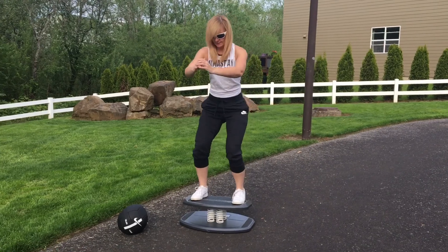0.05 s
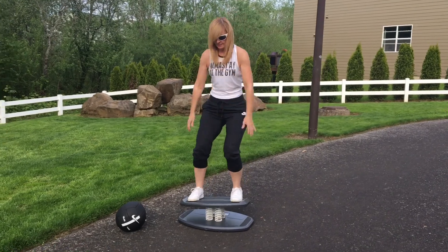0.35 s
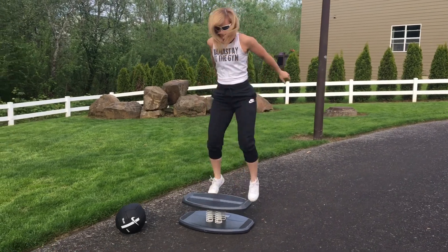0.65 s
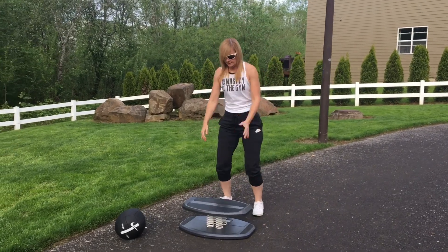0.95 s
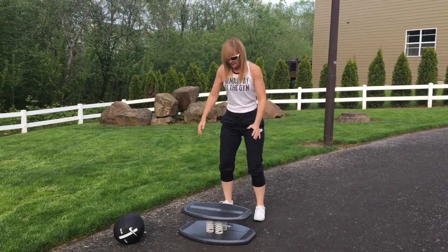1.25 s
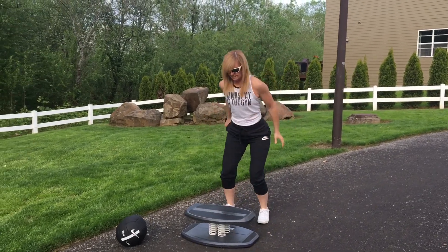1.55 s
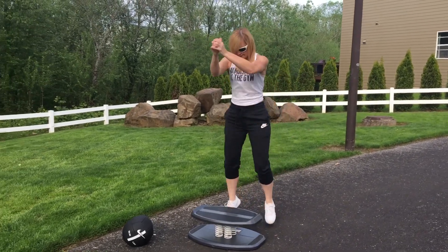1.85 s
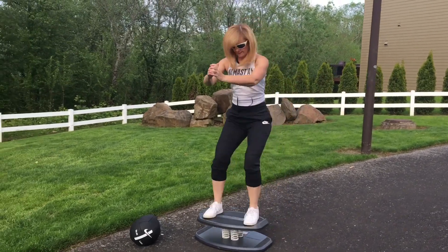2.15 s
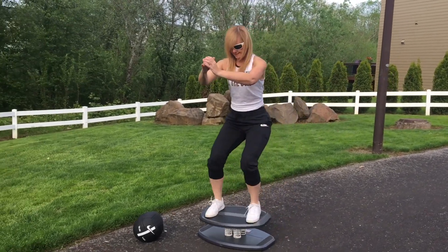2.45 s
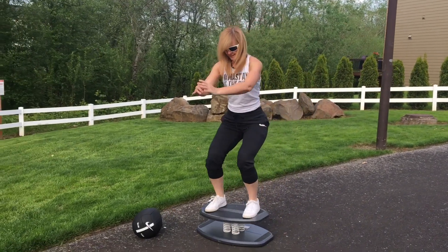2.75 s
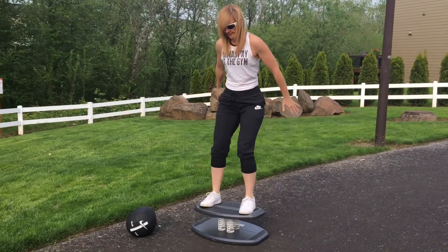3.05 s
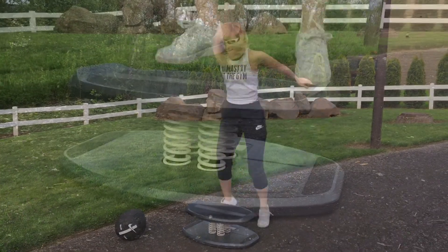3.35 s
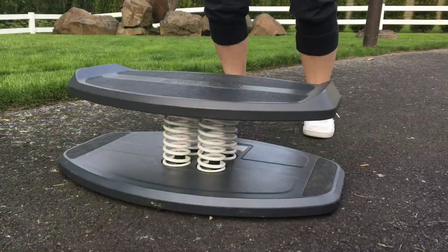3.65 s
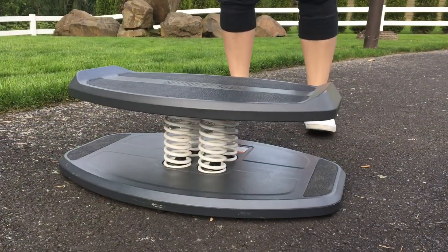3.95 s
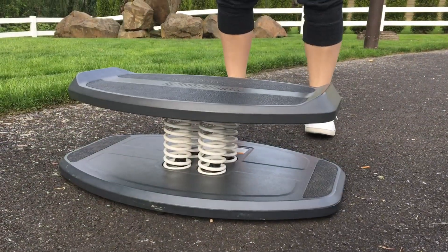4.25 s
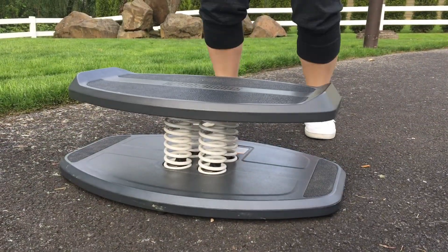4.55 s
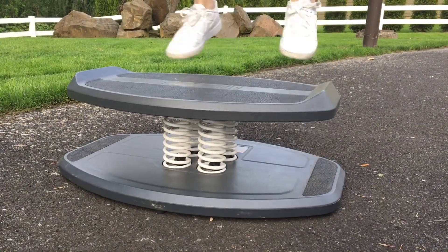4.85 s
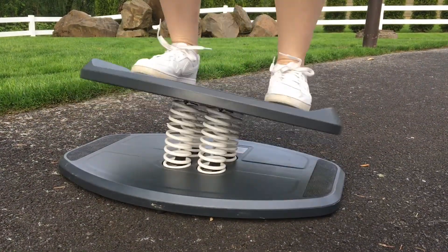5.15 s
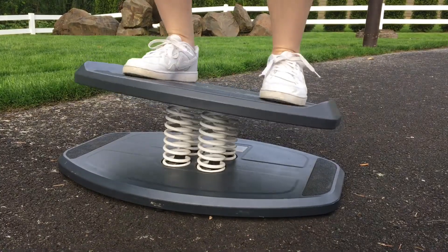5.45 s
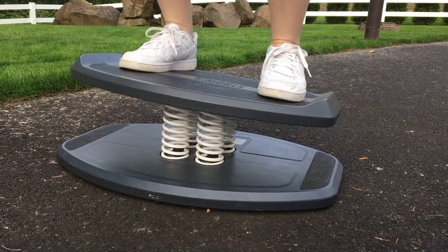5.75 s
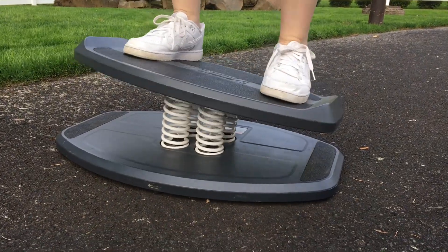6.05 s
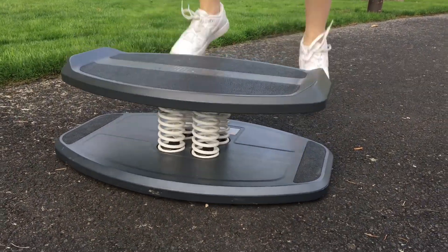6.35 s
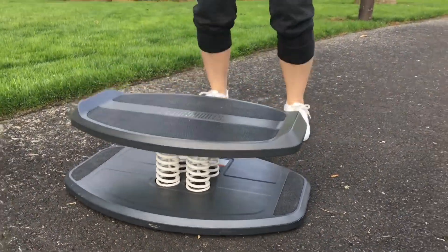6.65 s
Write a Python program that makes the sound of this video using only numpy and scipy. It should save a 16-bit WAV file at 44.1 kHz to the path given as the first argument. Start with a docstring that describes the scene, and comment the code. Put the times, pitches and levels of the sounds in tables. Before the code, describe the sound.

A plastic board on steel springs takes slapping landings and judders with ringing coils at each jump off, with faint birdsong behind.

```python
"""Balance board on a driveway

Someone jumps on and off a plastic board on four steel springs, on asphalt beside a garden.
Shoes slap the deck and set the coils singing; at each jump off, the freed deck judders on its
springs and the base clops on the ground. Soles scuff, grit ticks under them, birds whistle in
the trees and far traffic hums."""
import sys
import numpy as np
from scipy import signal
from scipy.fft import rfft, irfft
from scipy.io import wavfile

SR = 44100
rng = np.random.default_rng(int(sys.argv[2]) if len(sys.argv) > 2 else 0)


def transcribe(signal):
    """Save signal, clipped to [-1, 1], as a 16-bit WAV file at the path in sys.argv[1]."""
    frames = np.atleast_2d(signal).T
    limited = np.clip(frames, -1, 1)
    pcm = np.round(limited * 32767).astype(np.int16)
    wavfile.write(sys.argv[1], SR, pcm)


N = 300321
TIME = np.arange(N) / SR
HIT_SAMPLES = 8192

# Jumps off the deck: start_s, release_db, swing_gap_s, hardest_after_s, hardest_db, falloff_db_per_s
JUMPS_OFF = [(0.5756, -26.5, 0.057, 0.057, -22.5, 176), (3.221, -24.5, 0.049, 0.13, -21.5, 69),
             (6.2504, -15, .0470, 0.092, -20.5, 28.5)]
# Jumps onto the deck: start_s, slap_db, first_contact_hz, last_contact_hz, knock_db
LANDINGS = [(2.1886, -21, 1020, 3860, -30.5), (5.0440, -8, 2406, 2700, -21.5)]
# Footfalls on the asphalt: start_s, thud_db, thud_hz, slap_db
FOOTFALLS = [(0.881, -40, 163, -38), (3.601, -28.5, 135, -32.5), (4.032, -39.5, 196, -53.5),
             (4.441, -37.5, 220, -53), (6.580, -28.5, 140, -32)]
# Colour of the contact noise: frequency_hz, relative_db
CONTACT_SPECTRUM = [(120, -38.5), (200, -0.5), (696, -12.5), (933, -7), (1370, -17), (1650, -21.5),
                    (2090, -13.5), (2700, -25.5), (3830, -20.5), (4600, -31), (8120, -35.5), (16000, -41)]
# Modes of the hollow shell around the spring seats: pitch_hz, relative_db, t60_s
SHELL_MODES = [(214, -8.5, 0.11), (249.3, -6, 0.09), (313.7, -8, 0.23), (360.5, 5.5, 0.13),
               (416.5, -8, 0.14), (486, -16.5, 0.069), (588.5, -10.5, 0.092), (680, -17.5, 0.0129)]


def from_db(db):
    return 10 ** (np.asarray(db) / 20)


def rms_one(x):
    return x / np.sqrt(np.mean(x ** 2) + 1e-20)


def peak_one(x):
    return x / np.max(np.abs(x))


def add(out, start_s, sound):
    at = max(round(start_s * SR), 0)
    out[at:at + len(sound)] += sound[:max(N - at, 0)]


def fade(t60_s, size=HIT_SAMPLES):
    return from_db(-60 * TIME[:size] / t60_s)


def low_pass(x, hz):
    return signal.sosfilt(signal.butter(2, min(hz, SR / 2 - 1), fs=SR, output="sos"), x)


def resonate(x, hz, q):
    """One broad resonance."""
    return signal.lfilter(*signal.iirpeak(min(hz, SR / np.e), max(q, hz / SR * np.pi), fs=SR), x)


def wobble(hz, size):
    """Random movement, mostly slower than hz; rms 1."""
    return rms_one(low_pass(rng.standard_normal(size), hz))


def noise(spectrum, size=HIT_SAMPLES):
    """Noise of a given colour; rms 1."""
    hz, db = np.transpose(spectrum)
    bins_hz = np.maximum(np.fft.rfftfreq(size, 1 / SR), 1)
    colour = from_db(np.interp(np.log(bins_hz), np.log(hz), db))
    return rms_one(irfft(rfft(rng.standard_normal(size)) * colour, size))


def struck(modes):
    """Decaying sines, neighbours in opposition; each blow lands elsewhere and rebalances them."""
    waves = np.array([(-1) ** k * from_db(db) * fade(t60_s) * np.sin(2 * np.pi * hz * TIME[:HIT_SAMPLES])
                      for k, (hz, db, t60_s) in enumerate(modes)])
    return peak_one(from_db(rng.normal(0, 1.5, len(waves))) @ waves)


def air(level_db, crossfade_s):
    """Far traffic and leaves; a wide, open background crossfades into a closer, duller one."""
    # Wide, open background: frequency_hz, relative_db
    wide_spectrum = [(15, -41), (25, -32), (38, 2), (76, 4), (114, -1.5), (166, -3), (200, -8.5),
                     (326, -10.5), (476, -17.5), (531, -15.5), (1520, -16.5), (2160, -21.5), (2910, -28.5),
                     (12500, -46.5), (16000, -47)]
    # Closer, duller background: frequency_hz, relative_db
    close_spectrum = [(15, -58), (25, -10.5), (59, 3), (123, -0.5), (141, -7), (212, -7), (384, -13.5),
                      (427, -17), (545, -18.5), (591, -21.5), (1400, -25), (1890, -26), (2050, -26.5),
                      (3340, -32.5), (16000, -47.5)]
    blend = np.interp(TIME, crossfade_s, (0, 1))
    wide = np.sqrt(1 - blend) * noise(wide_spectrum, N)
    close = np.sqrt(blend) * noise(close_spectrum, N)
    return from_db(level_db) * (wide + close)


def birds(waver, flutter_db, echo_db, echo_t60_s):
    """Nearly pure whistles that flutter on their long way, smeared by echoes from the trees."""
    # Plain whistles: start_s, length_s, start_hz, end_hz, level_db
    whistles = [(0, 0.22, 3400, 3430, -59), (0.524, 0.092, 2045, 1800, -58),
                (1.024, 0.071, 3450, 2700, -66), (1.14, 0.053, 2560, 2420, -67),
                (1.15, .06, 4150, 4130, -78), (1.32, 0.079, 2036, 2300, -60),
                (3.144, .4, 3390, 3540, -66.5), (4.029, .4, 8600, 6900, -77),
                (4.413, .5, 3376, 3490, -58.5), (5.67, 0.13, 1920, 1850, -69.5),
                (6.382, 0.32, 2700, 2650, -69)]
    # A nearer call that rises to two crests and drops: time_s, pitch_hz, level_db
    crested_call = [(2.93, 1410, -59), (2.985, 1560, -59.5), (3.02, 1850, -46), (3.055, 1760, -60),
                    (3.1, 1890, -45.5), (3.12, 1507, -54), (3.15, 1180, -50)]
    calls = [[(s, hz * (1 - 0.036), db), (s + 0.018, hz, db),  # scoop up
              (s + 0.35 * length_s, hz, db),  # hold
              (s + length_s, end_hz, db - 3.5)]  # glide and weaken
             for s, length_s, hz, end_hz, db in whistles]
    out = np.zeros(N)
    for call in calls + [crested_call]:
        s, hz, db = np.transpose(call)
        t = np.arange(s[0], s[-1], 1 / SR)
        pitch_hz = np.interp(t, s, hz) * (1 + waver * wobble(74, len(t)))
        level = from_db(np.interp(t, s, db) + flutter_db * wobble(49, len(t)))
        tone = np.sin(2 * np.pi * np.cumsum(pitch_hz) / SR)
        add(out, s[0], level * signal.windows.tukey(len(t), 0.1) * tone)
    trees = rng.standard_normal(SR) * fade(echo_t60_s, SR)
    return out + from_db(echo_db) * signal.fftconvolve(out, trees / np.linalg.norm(trees))[:N]


def scuffs(grain_db, q, sand_db, sand_spread_db):
    """Dragging soles: uneven grains that swell and die away; bright strokes carry a sandy hiss."""
    # Drags of one push-off: before_release_s, relative_db, length_s, pitch_hz
    push_off = [(.09, -42, .13, 4900), (.06, -35, 0.16, 1100), (.003, -29.5, 0.028, 3700),
                (.004, -27, 0.052, 1110)]
    # Shoes shifting their grip: start_s, level_db, length_s, pitch_hz
    shuffles = [(2.196, -43, 0.0078, 4220), (2.206, -48, 0.069, 1250), (3.332, -50, 0.13, 1020),
                (4.726, -69, 0.29, 6700), (5.068, -60, 0.16, 4400), (5.189, -33, 0.017, 1430),
                (5.232, -49.5, 0.032, 1370), (5.358, -50, .055, 5900), (6.363, -51.5, 0.035, 1450),
                (6.538, -45.5, 0.053, 1180), (6.697, -54, 0.024, 2920)]
    pushes = [(s - lead_s, db + relative_db, length_s, hz)
              for s, db, *_ in JUMPS_OFF for lead_s, relative_db, length_s, hz in push_off]
    step_scrapes = [(s - 0.031, db - 28, 0.12, 4900) for s, *_, db in FOOTFALLS]
    out = np.zeros(N)
    for s, db, length_s, hz in pushes + step_scrapes + shuffles:
        size = int(1.5 * length_s * SR)  # half as long again for the tail
        slips = rng.standard_normal(size) * from_db(grain_db * wobble(360, size))
        rub = rms_one(low_pass(resonate(slips, hz, q), 1.21 * hz))
        grains = slips * from_db(sand_spread_db * rng.exponential(1, size))
        sand = from_db(sand_db) * (hz / 5000) ** 2 * rms_one(resonate(grains, 11000, q=1.4))
        swell = np.sin(np.pi * np.linspace(0, 1, size) ** 0.5) ** 2
        add(out, s, from_db(db) * (rub + sand) * swell)
    return out


def deck_swings(jitter_s, spread_db):
    """The freed deck rocks, hardest soon after release: seven end stops a jump, as start_s, level_db."""
    stops = []
    for s, release_db, gap_s, hardest_s, hardest_db, falloff in JUMPS_OFF:
        after_s = 0.006 + gap_s * np.arange(1, 7)  # the parting soles hold the first swing back
        late, harder = rng.standard_normal((2, len(after_s)))
        levels_db = hardest_db - falloff * abs(after_s - hardest_s) + spread_db * harder
        stops += [(s, release_db), *zip(s + after_s + jitter_s * late, levels_db)]
    return stops


def slap_blows(stops):
    """Soles land, the deck flicks free and shakes, shoes meet the ground: start_s, level_db, pitch_hz."""
    landings = []
    for s, db, first_hz, last_hz, _ in LANDINGS:
        # The soles roll flat in three quick contacts, then settle in two weaker ones.
        landings += [(s + k * 0.0043, db, hz) for k, hz in enumerate(np.linspace(first_hz, last_hz, 3))]
        landings += [(s + k * 0.024, db - k * 12, 1480) for k in (1, 2)]
    flicks = [(s, db - 18.5, 1500) for s, db, *_ in JUMPS_OFF]
    shakes = [(s, db - 21, 950) for s, db in stops]
    steps = [(s, db, 940) for s, *_, db in FOOTFALLS]
    return landings + flicks + shakes + steps


def slaps(blows, crack_db, tail_db, q):
    """Sole on plastic: a crack of contact noise and the deck's modes; where it lands sets which lead."""
    # Modes of the plastic deck: pitch_hz, relative_db, t60_s
    deck_modes = [(320.3, 4, 0.23), (550, -5, 0.12), (670, -2, 0.064), (868, -17.5, 0.03), (928, -17, 0.17),
                  (1051, -20, 0.058), (1116, -9.5, 0.14), (1240, -3, .07), (1368, -6, 0.066),
                  (1600, -16, 0.068), (1760, -8.5, .06), (1964, -2.5, 0.043), (2039, 1, 0.023),
                  (2243, 3, 0.025), (2473, -5, 0.035), (2870, -35, 0.026), (3180, -6, 0.014),
                  (3510, -15, 0.01), (3660, -12, 0.024), (4060, -5.5, 0.015), (6290, -15.5, 0.024),
                  (8540, -18, 0.046), (9300, -13.5, 0.025)]
    decay = fade(0.032) + from_db(tail_db) * fade(0.036)
    out = np.zeros(N)
    for s, db, hz in blows:
        slap = struck(deck_modes) + from_db(crack_db) * noise(CONTACT_SPECTRUM) * decay
        add(out, s, from_db(db) * peak_one(resonate(slap, hz, q)))
    return out


def seat_blows(stops):
    """Springs hit and rebound at each stop, and knock as a landing sinks them: start_s, level_db, hz."""
    rocking = [(s + k * 0.018 * rng.uniform(0.8034, 1.2), db - k * 4.5, 630)
               for s, db in stops for k in range(2)]
    sinking = [(s + 0.016 + k * 0.0205, db - k * 4, 700) for s, *_, db in LANDINGS for k in range(5)]
    return rocking + sinking


def knocks(blows, rasp_db, rasp_t60_s):
    """The deck throws the springs against their seats: a short rasp, and the hollow shell booms."""
    out = np.zeros(N)
    for s, db, cutoff_hz in blows:
        rasp = from_db(rasp_db) * noise(CONTACT_SPECTRUM) * fade(rasp_t60_s)
        add(out, s, from_db(db) * peak_one(low_pass(struck(SHELL_MODES) + rasp, cutoff_hz)))
    return out


def coils(on_seats, on_deck, knock_db, slap_db, detune):
    """Every blow leaves the springs singing, higher under weight; unequal springs beat together."""
    # Modes of the steel coils: pitch_hz, free_db, stood_on_db, t60_s
    coil_modes = [(212, -2.5, -24.5, 0.81), (297, 7, -6, 0.7), (366.4, 2.5, 5, 0.59), (379.7, -3, -15, 1.5),
                  (432, 0, -8, 0.64), (495, -5.5, -12.5, 0.74), (524.3, -9.5, -10, 0.8),
                  (541, -13.5, -13, 1.83), (588, -50, -8.5, 0.55), (650, -18.5, -22, 0.87),
                  (1046, -51, -13, 0.59), (1180, -43, -20.5, 0.4), (1870, -61, -32, 0.37)]
    s, db, _ = np.transpose(on_seats + on_deck)
    db = db + np.repeat([knock_db, slap_db], [len(on_seats), len(on_deck)])
    stood_on = np.any([(s >= on[0]) & (s < off[0]) for on, off in zip(LANDINGS, JUMPS_OFF[1:])], axis=0)
    out = np.zeros(N)
    for hz, free_db, stood_on_db, t60_s in coil_modes:
        radius = from_db(-60 / (t60_s * SR))
        for spring in (-1, 0, 1):  # flat, in tune, sharp
            strength = from_db(db + np.where(stood_on, stood_on_db, free_db) - 2.2 * abs(spring))
            kicks = np.full(N, 1e-18)
            kicks[(s * SR).astype(int)] = strength * (rng.standard_normal(len(s)) if spring else 1)
            angle = 2 * np.pi * hz * (1 + spring * detune) / SR
            out += signal.lfilter([0, np.sin(angle)], [1, -2 * radius * np.cos(angle), radius ** 2], kicks)
    return out


def thumps(stops, t60_s):
    """Weight arriving on the ground gives a short low push, cushioned by the soles."""
    # The weight of one landing: after_contact_s, relative_db, pitch_hz
    weight = [(.005, -15.5, 190), (0.029, -10, 214.4), (0.035, -26.5, 57)]
    landings = [(s + after_s, db + relative_db, hz)
                for s, db, *_ in LANDINGS for after_s, relative_db, hz in weight]
    swings = [(s, db - 13, 139) for s, db in stops]
    steps = [(s, db, hz) for s, db, hz, _ in FOOTFALLS]
    out, size = np.zeros(N), SR // 4
    for s, db, hz in landings + swings + steps:
        push = np.sin(2 * np.pi * hz * TIME[:size]) * fade(t60_s, size)
        add(out, s, from_db(db) * peak_one(resonate(push, hz, q=0.88)))
    return out


def grit(grains_per_jump, t60_s, q, edge_db):
    """Stones and fine grains snap under shoe and base: pitched ticks with a sharp edge."""
    # Larger stones cracking: start_s, peak_db, pitch_hz
    stones = [(0.7090, -39, 2050), (0.8372, -41, 4000), (0.9945, -42.5, 9260), (2.2278, -44, 4070),
              (2.5150, -40, 2430), (2.9997, -48, 4070), (2.8066, -47.5, 3880), (3.4330, -39.5, 5600),
              (3.4750, -46, 4270), (3.5926, -30, 3360), (3.6525, -44, 2750), (4.8944, -40.5, 3240),
              (5.0785, -33, 3500), (5.1275, -43, 3490), (5.3623, -35.5, 3230), (6.0153, -47, 3900),
              (6.4718, -45, 3950), (6.5855, -36, 3700)]
    grains = [(s + 0.11 + 0.16 * later, -57 + 3 * louder, 5120 * 2 ** (0.5 * higher))
              for s, *_ in LANDINGS + JUMPS_OFF
              for later, louder, higher in rng.standard_normal((grains_per_jump, 3))]
    out, size = np.zeros(N), 2048
    decay = fade(t60_s, size) + from_db(-22) * fade(0.04, size)
    for s, db, hz in stones + grains:
        snap = rng.standard_normal(size) * decay
        edge = from_db(edge_db) * resonate(snap, 9000, q=0.6)
        add(out, s, from_db(db) * peak_one(resonate(snap, hz, q) + edge))
    return out


def clops(q, rasp_db, rasp_t60_s, shell_db):
    """The base tips and falls flat: a pop of two or three cycles that also shakes the shell."""
    # The base clapping on the asphalt: start_s, level_db, pitch_hz
    base_hits = [(0.8109, -26, 714), (0.8201, -25.5, 791.3), (3.5314, -19.5, 700), (3.5546, -17.5, 691),
                 (6.4712, -20.5, 700), (6.5098, -16, 652), (6.54, -23, 685), (6.5765, -24.5, 716)]
    impulse = signal.unit_impulse(HIT_SAMPLES) + 1e-18
    out = np.zeros(N)
    for s, db, hz in base_hits:
        ring = resonate(resonate(impulse, hz, q), hz, q)
        pop = peak_one(low_pass(ring, 1116))
        rasp = from_db(rasp_db) * noise(CONTACT_SPECTRUM) * fade(rasp_t60_s)
        add(out, s, from_db(db) * (pop + rasp + from_db(shell_db) * struck(SHELL_MODES)))
    return out


def yard_echo(x, wet_db, t60_s, cutoff_hz):
    """Faint dull scatter from house wall, fence and trees."""
    build_up = 1 - fade(0.05, SR)
    tail = low_pass(rng.standard_normal(SR), cutoff_hz) * fade(t60_s, SR) * build_up
    return x + from_db(wet_db) * signal.fftconvolve(x, tail / np.linalg.norm(tail))[:N]


def scene():
    """Board, ground and shoes up close, with birds and air behind; mono."""
    stops = deck_swings(jitter_s=0.00189, spread_db=2)
    on_deck, on_seats = slap_blows(stops), seat_blows(stops)
    near = slaps(on_deck, crack_db=-4, tail_db=-18.5, q=1.0)
    near += knocks(on_seats, rasp_db=-10.5, rasp_t60_s=0.087)
    near += coils(on_seats, on_deck, knock_db=-21.5, slap_db=-28, detune=0.02)
    near += clops(q=1.43, rasp_db=-22, rasp_t60_s=0.059, shell_db=-13)
    near += thumps(stops, t60_s=0.031)
    near += grit(grains_per_jump=6, t60_s=0.013, q=4.6, edge_db=-28.5)
    near += scuffs(grain_db=3, q=0.49, sand_db=-4.5, sand_spread_db=4)
    mix = yard_echo(near, wet_db=-33.5, t60_s=1.0, cutoff_hz=2170)
    mix += birds(waver=0.0066, flutter_db=2, echo_db=-4.5, echo_t60_s=0.96)
    mix += air(level_db=-52.5, crossfade_s=(3.1, 3.7))
    return mix[None]


def record(dry):
    """A small microphone sheds the deep bass; the top is cut steeply."""
    thin = signal.sosfilt(signal.butter(3, 42, "high", fs=SR, output="sos"), dry)
    return signal.sosfilt(signal.ellip(10, 0.1, 70, 15900, fs=SR, output="sos"), thin)


dry = scene()
out = record(dry)
transcribe(out)
```